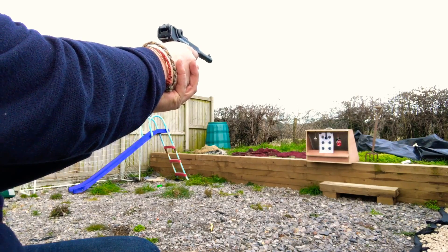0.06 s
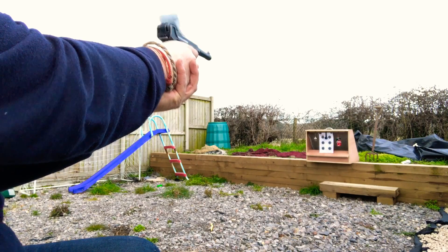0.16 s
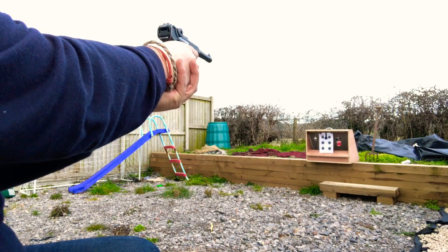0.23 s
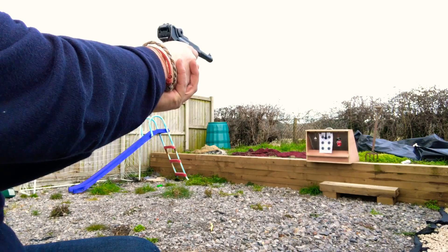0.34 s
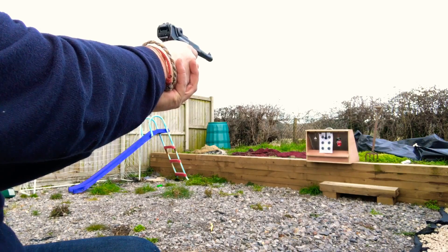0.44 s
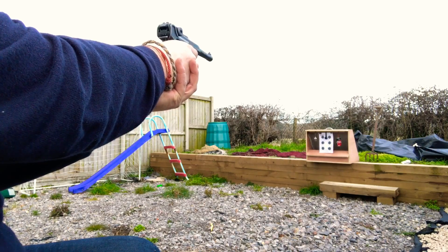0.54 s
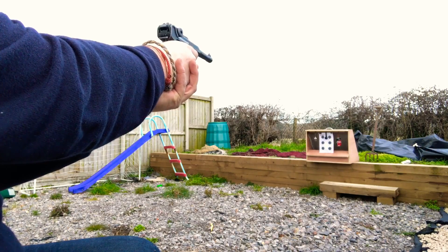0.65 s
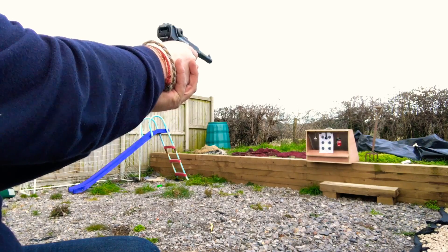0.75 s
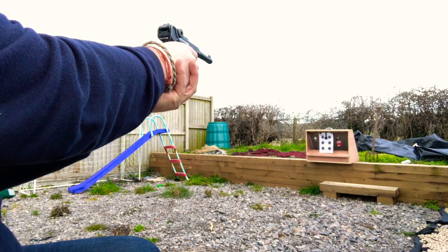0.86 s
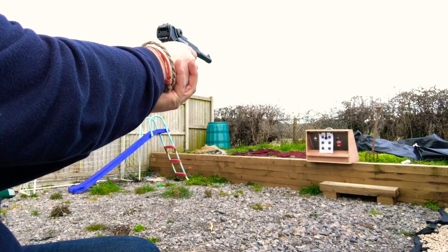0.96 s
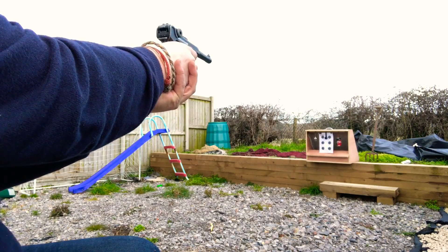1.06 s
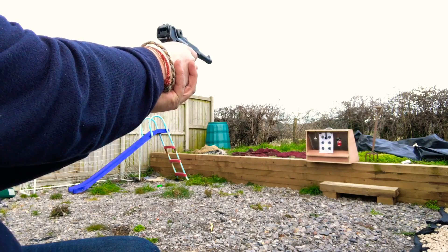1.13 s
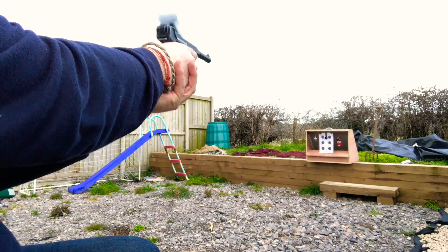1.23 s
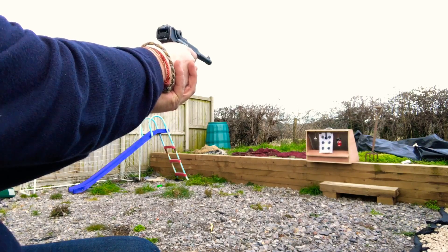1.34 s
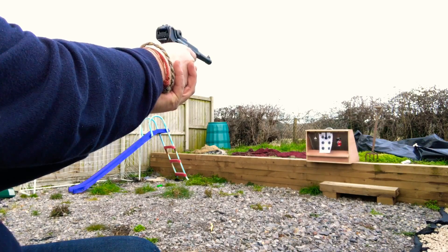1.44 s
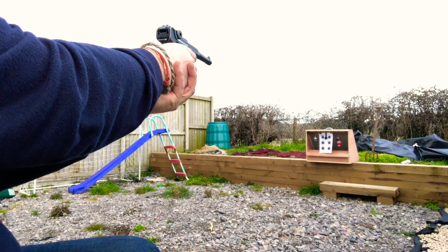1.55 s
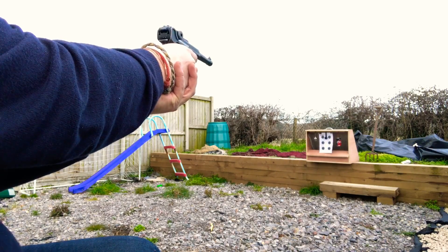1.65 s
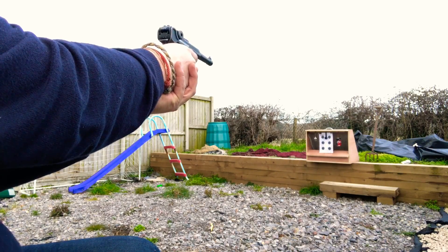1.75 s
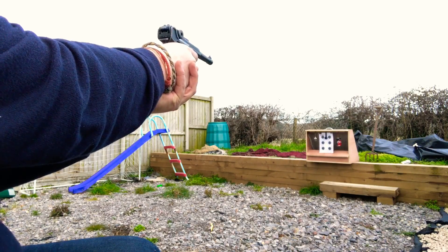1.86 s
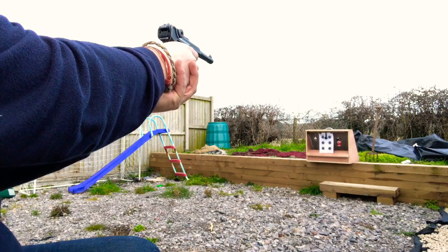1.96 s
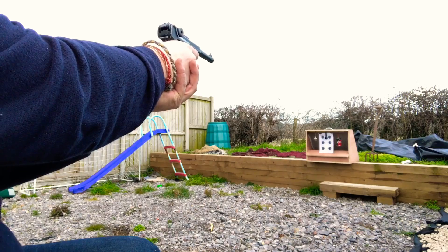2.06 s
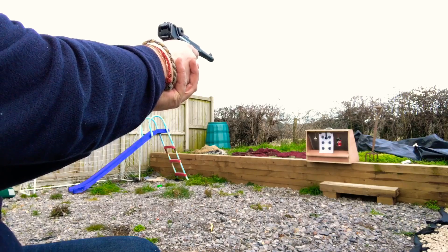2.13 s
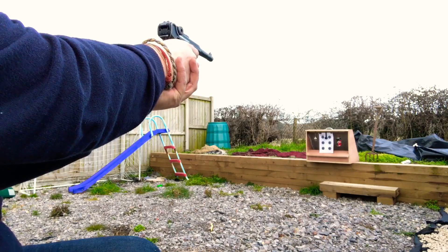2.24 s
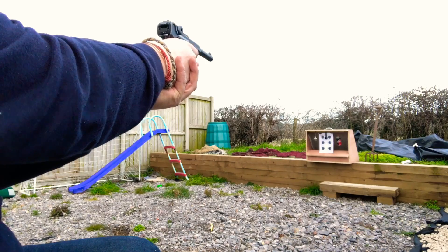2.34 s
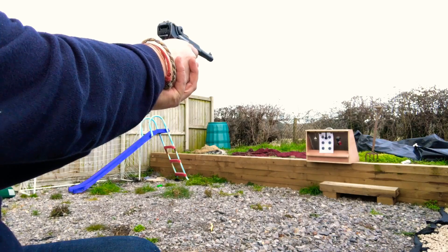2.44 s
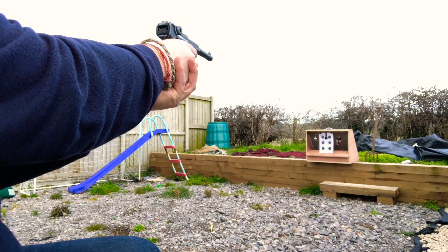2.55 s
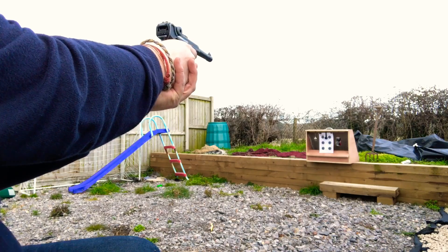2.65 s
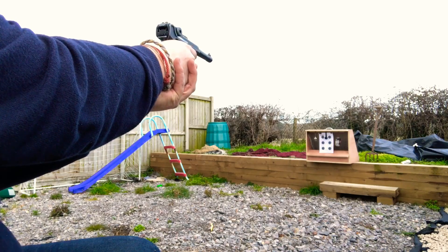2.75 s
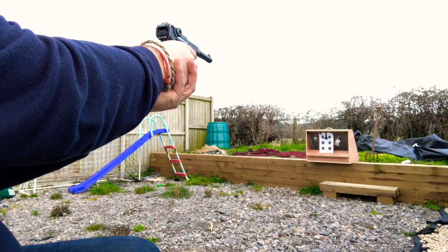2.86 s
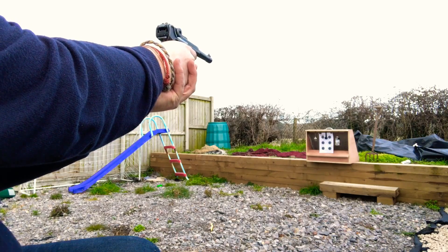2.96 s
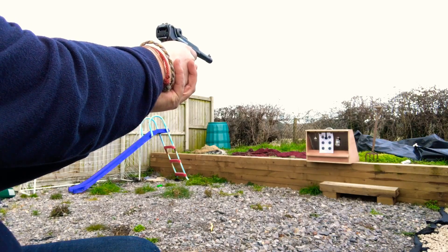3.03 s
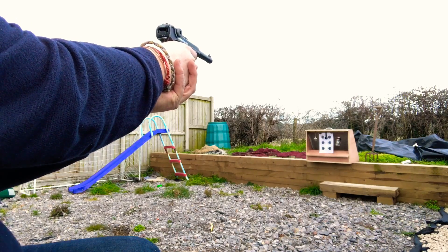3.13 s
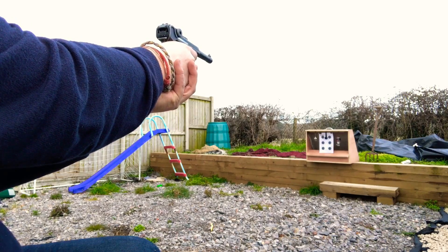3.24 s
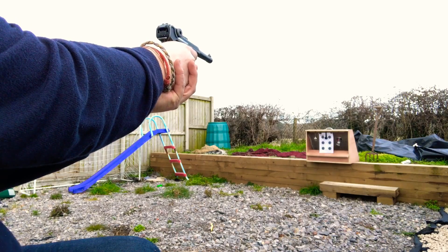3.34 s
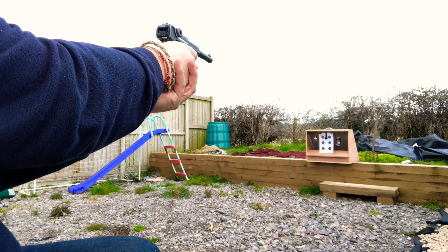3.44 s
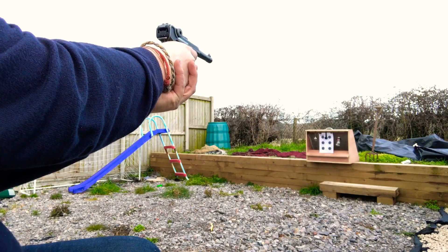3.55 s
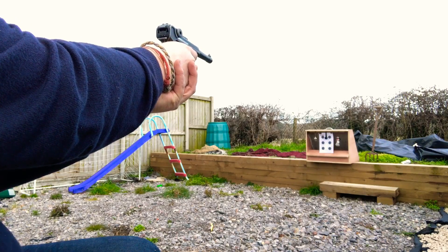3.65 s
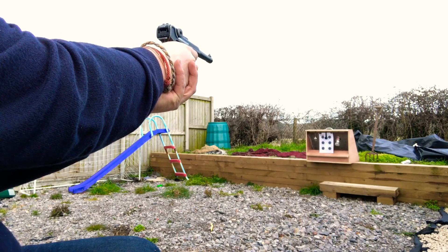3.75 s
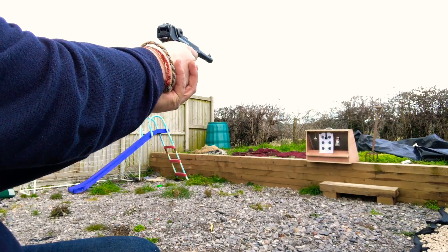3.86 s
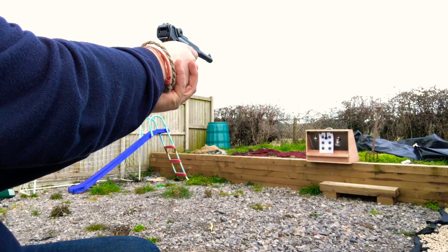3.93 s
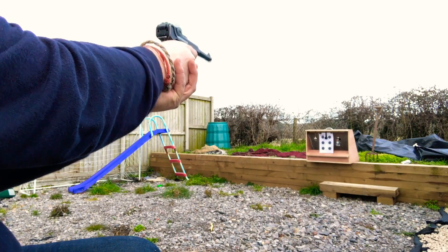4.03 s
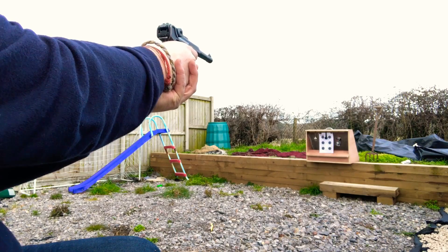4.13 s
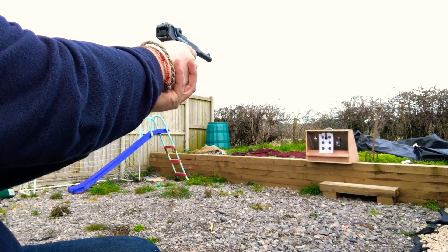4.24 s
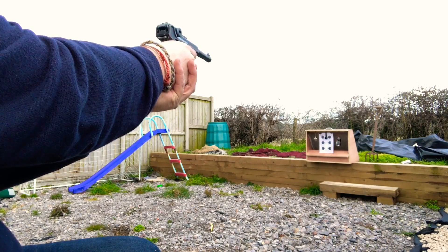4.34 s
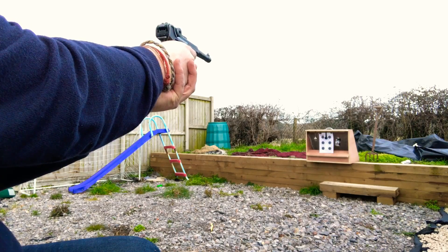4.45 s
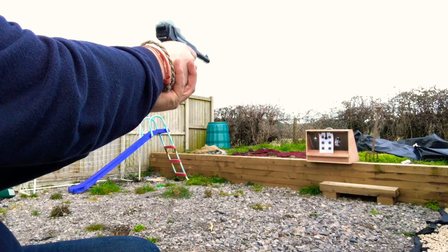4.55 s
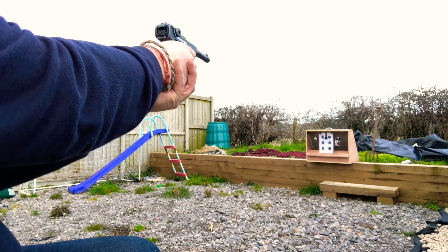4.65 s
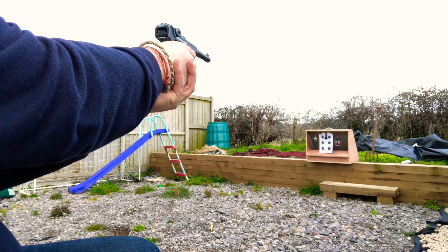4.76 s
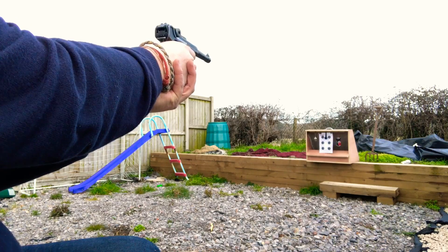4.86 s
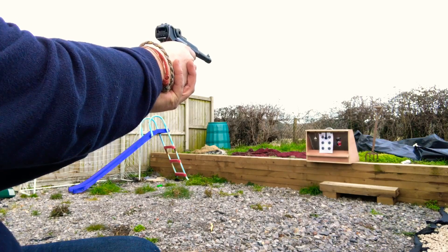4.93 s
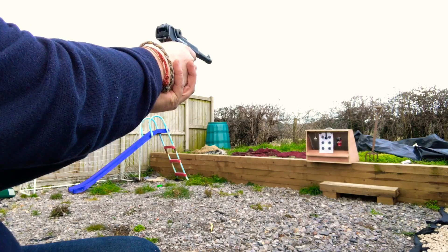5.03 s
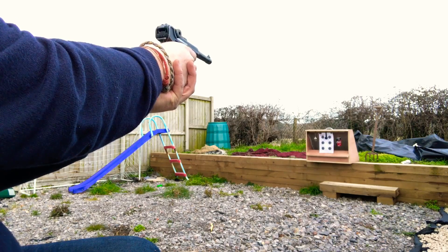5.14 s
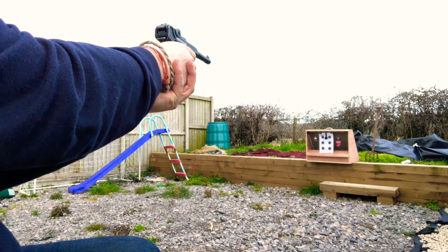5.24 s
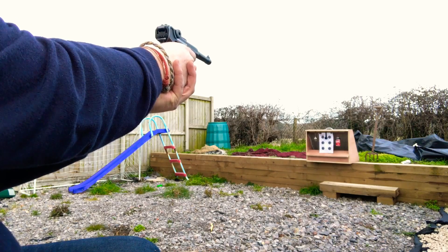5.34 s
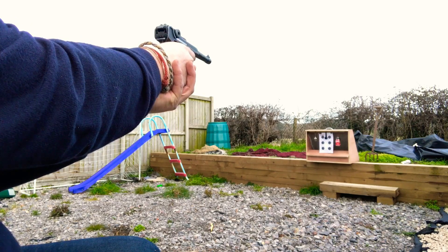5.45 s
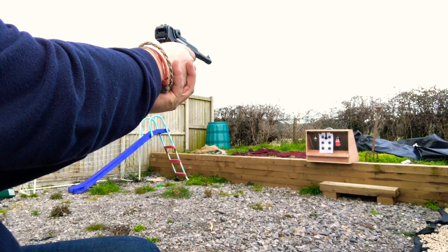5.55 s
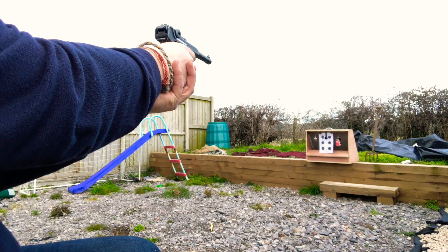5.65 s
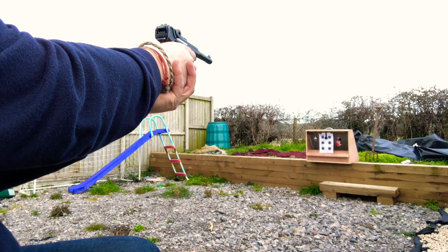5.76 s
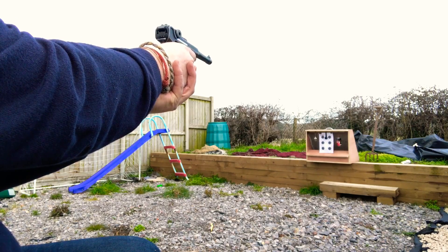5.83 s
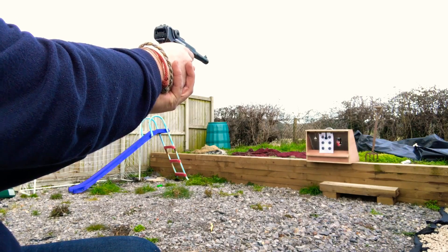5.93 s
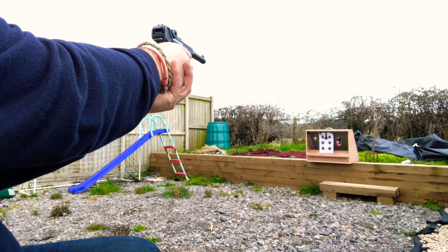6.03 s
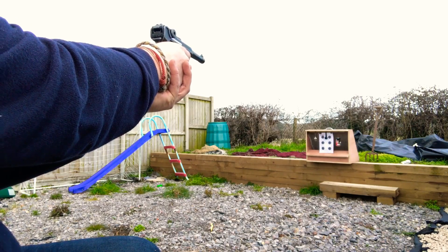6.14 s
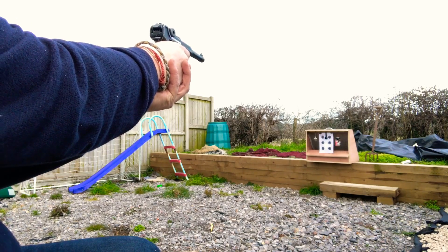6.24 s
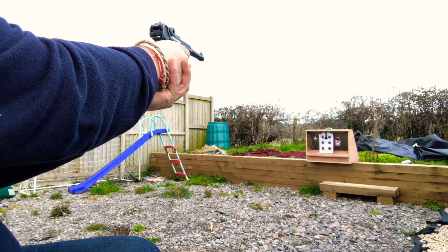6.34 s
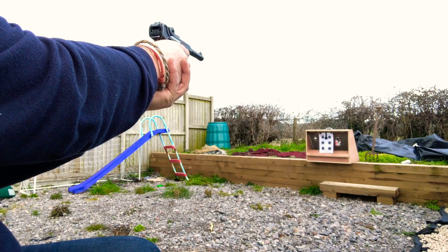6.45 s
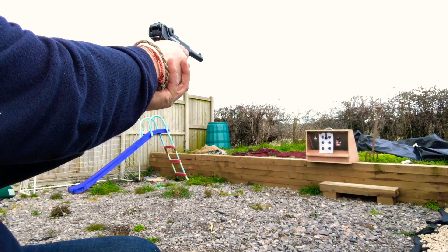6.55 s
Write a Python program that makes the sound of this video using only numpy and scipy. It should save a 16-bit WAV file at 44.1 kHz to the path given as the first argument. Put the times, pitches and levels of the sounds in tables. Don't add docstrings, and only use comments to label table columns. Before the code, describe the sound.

Seven snappy air pistol shots pop and clack close by outdoors, pellets rap a box, and one metal flap rattles to rest.

```python
import sys
import numpy as np
from scipy import signal
from scipy.fft import rfft, irfft
from scipy.io import wavfile
from scipy.ndimage import uniform_filter1d

SR = 44100
rng = np.random.default_rng(int(sys.argv[2]) if len(sys.argv) > 2 else 0)


def wrap_up_sound(samples):
    columns = np.atleast_2d(samples).T
    tamed = np.clip(columns, -1, 1)
    steps = np.round(tamed * 32767).astype(np.int16)
    wavfile.write(sys.argv[1], SR, steps)


def boost_factor(decibels):
    exponent = np.asarray(decibels, float) / 20
    return 10 ** exponent


N = 290619

# frequency in Hz, density in dB per Hz.
TOWN_SPECTRUM = [(15, -48.5), (25, -25.5), (40, -9.5), (65, -2.5), (220, -6), (445, -13.5), (902, -5.5),
                 (1430, -18), (1640, -24), (1950, -28.5), (2330, -33), (3150, -34), (4860, -35),
                 (14800, -47), (16500, -55)]
# start in seconds, length in seconds, first pitch in Hz, last pitch in Hz, level in dB.
BIRD_CALLS = [(0, 0.22, 3360, 3500, -80), (5.62, .24, 1960, 2090, -67.5), (5.82, .23, 2090, 2130, -76),
              (5.985, .1, 2950, 3050, -75), (6.06, .22, 3050, 3170, -70), (6.09, 0.19, 3330, 3370, -74),
              (6.14, 0.059, 3470, 3680, -72), (6.25, .05, 4300, 4200, -77), (6.335, .035, 6350, 6250, -76),
              (6.36, 0.13, 6100, 5450, -79), (6.335, 0.03, 4250, 4600, -76), (6.335, .03, 5200, 5500, -78),
              (6.395, 0.03, 4000, 3950, -73), (6.45, .03, 4200, 4150, -75), (6.5, .05, 4500, 4350, -79)]
# start in seconds, length in seconds, level in dB.
BIRD_NOTES = [(1.92, 0.063, -67), (2.12, .09, -65.5), (2.896, 0.11, -59), (3.303, 0.0682, -80),
              (3.65, 0.1547, -73), (3.82, 0.1173, -76), (4.448, 0.04195, -72.5)]
# time in seconds, level in dB.
SEAR = [(0.1853, -53.5), (0.191, -49.5), (0.1963, -43.5), (0.2031, -32), (0.751, -52), (0.759, -37),
        (1.256, -51), (1.265, -47.5), (1.2748, -57), (2.3133, -52.5), (2.3234, -42.5), (4.0322, -52),
        (4.038, -50.5), (4.0456, -43.5), (4.602, -43), (5.225, -50.5), (5.2327, -37)]
# time in seconds, level in dB.
HAMMER = [(0.2077, -8), (0.775, -4), (1.2768, -9), (2.3366, -9), (4.0558, -7.5), (4.622, -5.5),
          (5.2482, -6)]
VALVE = [(0.2132, -5), (0.7796, -6.5), (1.2825, -4.5), (2.3417, -4.5), (4.06, -9), (4.629, -7),
         (5.2538, -8)]
UNLOCK = [(0.2183, -13), (0.7885, -17.5), (1.2895, -15), (2.3506, -27), (4.0671, -14), (4.639, -15.5),
          (5.2566, -16)]
REAR_STOP = [(0.2266, -14), (0.7939, -18), (1.2995, -12.5), (2.3562, -14.5), (4.0703, -26), (4.6417, -23.5),
             (5.2689, -10.5)]
REBOUND = [(0.238, -22.5), (0.8033, -18.5), (1.311, -21.5), (2.3664, -17), (4.0792, -17.5), (4.652, -20.5),
           (5.2798, -19.5)]
SLAM = [(0.2753, -2), (0.8449, -4), (1.349, -5.5), (2.409, 3), (4.127, -4), (4.6951, -3), (5.3239, -1)]
# time in seconds, level in dB.
LOOSE = [(4.105, -16), (5.26, -17.5), (5.3, -20.5), (5.2645, -22.5), (5.299, -24.5), (.2495, -24),
         (4.6575, -17.5)]
# level in dB, one a shot.
FEED_DB = [-23.5, -24.5, -20.5, -25, -21, -23, -24]
VOICES = {"hammer": (-0.42, 0.44, 13), "valve": (-1, -0.78, 15), "unlock": (1.9, -0.55, 17),
          "rear": (-0.96, -2.5, 27), "rebound": (-1, -0.54, 45), "feed": (-7, -4.5, 22),
          "slam": (-2.5, 0.31, 5.5), "loose": (-3, -2.5, 6.5), "trigger": (-1.5, -1.5, 2.7)}
# frequency in Hz, level in dB, T60 in seconds.
GUN_MODES = [(1263, -6.5, 0.017), (3640, -14.5, .01), (4350, -11, .01), (5130, -2, 0.014),
             (6770, 0, 0.0079), (7651.5, -4.5, 0.02), (11570, -1, 0.014), (13510, -5, 0.024)]
# start in seconds, muzzle pop after it in ms, breech thump after it in ms, thump polarity.
SHOTS = [(.2085, 4.3, 15.1, -1), (.7747, 5, 18.5, 1), (1.2756, 7.7, 19.4, -1), (2.3377, 4, 18.2, 1),
         (4.0568, 3.9, 17.5, 1), (4.6235, 3.5, 18.7, 1), (5.2496, 3.4, 19.2, 1)]
# pop in dB, thump in dB, gas in dB, slide scrape in dB.
CHARGE = [(-16, -8, -19, -28), (-17, -7.5, -17.5, -24.5), (-16, -9.5, -20, -29), (-13.5, -7.5, -19, -28.5),
          (-19.5, -11, -19.5, -27), (-16.5, -6.5, -17, -28.5), (-20, -5, -24.5, -28.5)]
# frequency in Hz, density in dB per Hz.
GAS_SPECTRUM = [(88, -30), (150, -6.5), (371, -7), (720, -9), (1400, -6.5), (3040, -8), (5170, -5),
                (12000, -12.5), (16500, -21)]
# band centre in Hz, level in dB, T60 in seconds.
YARD_BANDS = [(118, -21, 0.27), (267, -29.5, .55), (469.7, -19.5, 0.38), (720, -23.5, 0.41),
              (1078, -10.5, 0.23), (1500, -23, .33), (1940, -20, 0.6), (4070, -21.5, 0.47),
              (8028, -17, 0.37), (13900, -15, 0.15)]
# delay in ms, level in dB.
ECHOES = [(12, -21.5), (25, -19), (49, -28), (88, -21.5)]
# time in s, level in dB, lows against mids in dB, highs against mids in dB, T60 in ms.
HITS = [(0.2923, -5.5, 7, -13.5, 5.1), (0.3049, -24.5, 0.5, -9, 59), (0.3344, -19, 1, -14.5, 7.3),
        (0.339, -28, 6.5, -14, 4.18), (0.8563, -12, -13, -14, 6.3), (0.859, -12.5, 3.5, -2, 5.366),
        (0.8715, -22.5, 6, -9.5, 45.8), (1.3655, -16, 4.5, -2.5, 7.2), (1.3673, -4, 0.5, -10.5, 3.5),
        (1.3764, -26, 9.5, 18, 39), (1.4034, -25.5, -10, -15, 15), (1.4079, -24, 10.5, -2, 13.3),
        (2.4212, -18.5, -4, -2.5, 120), (2.4257, -11, 3.5, -0.5, 22), (4.7109, -15, 4.5, -16.5, 37),
        (4.7256, -22.5, -5.5, -5, 22), (4.7516, -22, -12.5, -10.5, 13.3), (5.338, -18.5, 1.5, -2.5, 47)]
# frequency in Hz, level in dB, T60 in seconds.
BOX_MODES = [(342, -16, 0.15), (1140, -15, 0.062), (1617, -17, 0.014), (2450, -19, 0.018),
             (3040, -3, 0.014), (3460, -1.5, 0.014), (4430, -8.5, 0.028), (7360, -9, 0.017)]
# time in seconds, level in dB, centre in Hz, T60 in ms.
KNOCKS = [(.293, -28.5, 1719, 9.8), (0.305, -26, 1300, 24.19), (0.338, -21, 1150, 14),
          (0.5753, -42, 1500, 12), (0.6103, -44.5, 1850, 28.06), (0.86, -20, 1500, 15),
          (0.873, -28.5, 1200, 39.67), (1.369, -24, 1407, 12.52), (1.376, -31, 1200, 21.53),
          (1.406, -23, 1400, 22), (1.6531, -41.5, 1300, 16.2), (1.6955, -41, 1817, 12),
          (1.7618, -48.5, 1688, 13.07), (1.9017, -47, 1584, 16.6), (2.4253, -12.5, 1300, 34),
          (2.655, -36, 1786, 33), (2.868, -42, 1500, 34), (2.868, -43, 2500, 25), (4.711, -18, 1500, 23.87),
          (4.727, -20.5, 1700, 27), (4.755, -21, 1400, 17), (4.93, -49.5, 1500, 12), (5.338, -17, 1293, 34),
          (5.4636, -42, 1700, 15), (5.51, -44, 1798, 23)]
# time
# in seconds, level in dB, centre in Hz, T60 in ms.
CLACKS = [(.2935, -13, 3100, 32), (0.78, -18, 3400, 30), (1.3675, -15.5, 3000, 30), (2.4255, -17, 3450, 40),
          (2.4255, -18, 4050, 35), (4.7115, -14, 3400, 35), (.418, -38, 3100, 30), (.982, -39, 2950, 30),
          (4.837, -36.5, 2950, 30.7), (.3345, -20, 7500, 14)]
# time in seconds, frequency in Hz, level in dB, T60 in seconds, swell in seconds.
RINGS = [(.3, 200, -31, 0.43, .03), (.34, 129.5, -43, .4, 0.029), (0.881, 125, -38.5, 0.38, 0.031),
         (.9, 200.6, -40.5, .4, 0.027), (.32, 2450, -42, 0.33, .005), (1.313, 380, -26, 0.18, .003),
         (1.375, 330, -33, 0.21, 0.013), (1.41, 199, -37, 0.47, 0.02552), (1.652, 1140, -47, .15, 0.002756),
         (2.424, 1150, -21.5, 0.24, .004), (2.44, 124.4, -43.5, 0.41, 0.035),
         (2.44, 301.6, -36.5, 0.2116, .01), (4.16, 127, -44.5, 0.54, 0.047), (4.72, 283.5, -38, 0.35, .01),
         (4.761, 138.5, -42, 0.43, 0.032), (5.339, 1140, -37, .25, 0.003001),
         (5.342, 310, -35, 0.28, 0.0043), (5.342, 434, -34.5, 0.3, 0.003843)]
# time in seconds, frequency in Hz, level in dB.
PANEL = [(2.44, 705, -38.5), (2.45, 1380, -42), (2.45, 870, -42), (2.46, 2680, -46), (2.52, 1007, -41.5),
         (2.57, 2590, -48), (2.6, 703, -51), (2.61, 1380, -44), (2.612, 2590, -45), (2.665, 1007, -42.5),
         (2.655, 1810, -40), (2.665, 704, -41.5), (2.665, 3220, -38), (2.668, 4700, -40),
         (2.669, 2590, -44), (2.73, 3200, -39), (2.744, 5200, -42), (2.75, 2590, -47), (2.76, 710, -47),
         (2.75, 1014, -44), (2.751, 1380, -51), (2.849, 1200, -52), (2.55, 7700, -44), (2.665, 7660, -43),
         (2.75, 7700, -36), (2.61, 12800, -42), (2.75, 12800, -42.5), (2.88, 720, -52)]
# time in seconds, level in dB, steel hum in dB.
WALL = [(0.4172, -33, -47), (0.9812, -35, -52), (1.492, -39, -55), (4.836, -37, -52), (5.4636, -41, -64)]
# time in s, level in dB, lows against mids in dB, highs against mids in dB, T60 in ms.
BOUNCES = [(0.4217, -44, 18, -16.5, 27), (0.4367, -39, 10.5, -8.5, 10), (0.466, -47.5, 12.5, -14, 11),
           (0.573, -33, 12, -8, 5.2), (0.6085, -49, 11.5, -19.5, 32), (0.6842, -53.5, 13.5, -14, 12),
           (0.984, -45.5, -10, 6, 11), (0.9905, -37.5, -6.5, 4, 9.6), (1.6528, -37.5, -0.5, -14, 7.7),
           (1.6954, -52, 17, 6.5, 9.3), (1.707, -60.5, 19, -5.5, 10.7), (1.7618, -43, 4, -17, 16.5),
           (1.9013, -43, 1.5, -17, 17.7), (4.81, -45.5, -13, -12.5, 12), (4.9295, -41.5, -1, -15.5, 11.6),
           (5.0426, -49, 6, -10.5, 17), (5.089, -57.5, -14.5, -3, 7), (5.1057, -71, -16.5, -15, 8.8),
           (5.4564, -42, -3, 13, 7.7), (5.5102, -53.5, 24, -11.5, 17)]
# time in seconds, level in dB.
TRIGGER = [(1.2449, -59.5), (2.25, -48), (2.2546, -65.5), (3.125, -63), (3.264, -61), (3.4307, -60.5),
           (3.5246, -66.5), (4.5753, -58), (4.5838, -63)]
# frequency in Hz, level in dB, T60 in seconds.
PELLET_MODES = [(1840, -14, 0.018), (3160, -7.5, 0.011), (3472, -3.5, 0.049), (4200, -7, 0.0089),
                (6200, -8, 0.019), (7440, -8.5, 0.015)]
# time in s, level in dB, lows against mids in dB, highs against mids in dB, T60 in ms.
FLAP = [(2.5276, -42.5, -19, -8, 49.14), (2.5471, -43.5, -2, -19, 68), (2.5515, -28.5, 0, -17, 15),
        (2.6087, -31, -9.5, -5.5, 35.47), (2.617, -31.5, -1, -9, 16), (2.6651, -31.5, 0, -9, 65),
        (2.7291, -38.5, -3, -17, 42), (2.7464, -27.5, -3, -4, 14), (2.7534, -31.5, -22, -8, 22),
        (2.7905, -46, 13, -16.5, 40), (2.8165, -39.5, 6.5, -21, 12.9), (2.8492, -42.5, -1, -6.5, 29),
        (2.8735, -47, 5, -10.5, 15.6), (2.9028, -37, -4, -2.5, 19), (2.9157, -40.5, 1, -11, 15.2)]
# frequency in Hz, level in dB, T60 in seconds.
TIN_MODES = [(855, -17.5, 0.3), (1183, -5.5, 0.07226), (1504, -16, 0.23), (2404, -38, 0.16),
             (2998, -21, 0.091), (3360, -12.5, 0.1698), (3424, -17, 0.058), (3970, -14, 0.0889),
             (4760, -7, 0.13), (5315.5, -7.5, 0.1559), (7808, 2.5, 0.087), (9031.2, -12, 0.037),
             (10280, -12, 0.04), (12660, 3.5, 0.05824)]
# time in seconds, level in dB.
CHATTER = [(2.44, -48.5), (2.55, -54.5), (2.64, -48.5), (2.72, -54.5), (2.8, -57), (2.9, -64), (2.97, -60),
           (3.0, -83.5)]


def unit(x):
    return x / np.sqrt(np.mean(x ** 2))


def add(out, s, piece):
    k = int(s * SR)
    out[k:k + len(piece)] += piece[:N - k]


def band(x, lo_hz, hi_hz):
    return signal.sosfilt(signal.butter(2, [lo_hz, min(hi_hz, .45 * SR)], "bandpass", fs=SR, output="sos"), x)


def colour(spectrum, size):
    hz, db = np.transpose(spectrum)
    grid = np.maximum(np.arange(size // 2 + 1) * SR / size, 1)
    gain = boost_factor(np.interp(np.log(grid), np.log(hz), db))
    return unit(irfft(rfft(rng.standard_normal(size)) * gain, size))


def fade(t, t60, rise=0.00078):
    return (1 - np.exp(-t / rise)) * np.exp(-np.log(1000) * t / t60)


def walk(rate):
    k = int(SR / rate)
    held = np.repeat(rng.standard_normal(N // k + 1), k)
    return 0.57 * uniform_filter1d(uniform_filter1d(held, k), k)[:N]


def cluster(hz, t, spread):
    detune, phase = rng.standard_normal((2, 3, len(hz), 1))
    partials = np.sin(2 * np.pi * (hz * (1 + spread * detune) * t + phase))
    return np.sum(partials, axis=0) / np.sqrt(3)


def town():
    x = colour(TOWN_SPECTRUM, size=N + N % 2)[:N]
    rumble = band(x, 20, 400) * (boost_factor(1.2 * walk(6.6)) - 1)
    roar = band(x, 400, 1500) * (boost_factor(2.1 * walk(15.0)) - 1)
    return boost_factor(-58) * (x + rumble + roar)


def birds():
    out, waver = np.zeros(N), 1 + .035 * walk(400)
    note_hz = 2590
    for s, length, hz0, hz1, db in BIRD_CALLS + [(s, d, note_hz, note_hz, db) for s, d, db in BIRD_NOTES]:
        u = np.linspace(0, 1, int(length * SR))
        hz = (hz0 + (hz1 - hz0) * u) * waver[int(s * SR):][:len(u)]
        add(out, s, boost_factor(db) * np.sin(np.pi * u) ** 0.55 * np.sin(2 * np.pi * np.cumsum(hz) / SR))
    return out * boost_factor(5 * walk(40) + 5 * walk(200) - 4.5)


def voiced(table, part):
    return [(s, db, *VOICES[part]) for s, db in table]


def contacts(table, body, ring_db, snap_db, low_hz, rise, tail_db, tail_t60):
    (out, ringing), t = np.zeros((2, N)), np.arange(8192) / SR
    hz, mode_db, mode_t60 = np.transpose(body)[:, :, None]
    edges = [(low_hz, 4500), (4500, 8000), (8000, 19500), (300, 1500)]
    noise = np.array([unit(band(band(rng.standard_normal(SR), a, b), a, 1.1889 * b)) for a, b in edges])
    onset = 2 * (1 - np.exp(-t / rise))
    ring_t = t[:int(min(max(mode_t60.max(), .01), .18) * SR)]
    for s, db, lows_db, highs_db, ms in table:
        k = rng.integers(SR - 8192)
        lows, mids, highs, rattle = noise[:, k:k + 8192]
        burst = unit(boost_factor(lows_db) * lows + mids + boost_factor(highs_db) * highs)
        decay = onset * fade(t, max(ms, 4) / 1000, rise)
        buzz = boost_factor(tail_db) * fade(t, tail_t60, rise)
        add(out, s - rise, boost_factor(db) * burst * (decay + buzz) * boost_factor(3.41 * rattle))
        add(out, s, boost_factor(db + snap_db) * burst * fade(t, .001, rise=.00003))
        tilt_db = np.interp(hz, [2500, 6000, 11000], [lows_db, 0, highs_db]) - max(lows_db, 0, highs_db)
        struck_db = 4 * rng.standard_normal((len(hz), 1))
        modes = boost_factor(mode_db + tilt_db + struck_db) * cluster(hz, ring_t, spread=0.023)
        add(ringing, s, boost_factor(db + ring_db) * np.sum(modes * fade(ring_t, mode_t60, rise), axis=0))
    return np.array([out + ringing, out + boost_factor(-8) * ringing])


def action():
    sear = [(s, db, -6, 0, 7) for s, db in SEAR]
    fall = voiced(HAMMER, "hammer") + voiced(VALVE, "valve")
    feed = [(s - .0084, db) for (s, _), db in zip(SLAM, FEED_DB)]
    slide = voiced(UNLOCK, "unlock") + voiced(REAR_STOP, "rear") + voiced(REBOUND, "rebound")
    slide += voiced(feed, "feed") + voiced(SLAM, "slam") + voiced(LOOSE, "loose")
    struck = contacts(fall, GUN_MODES, ring_db=-6, snap_db=1.5, low_hz=870, rise=.0013,
                      tail_db=-24, tail_t60=0.065)
    return struck + contacts(slide + sear, GUN_MODES, ring_db=-6, snap_db=7.0, low_hz=870, rise=.0006,
                             tail_db=-24, tail_t60=0.081)


def hiss():
    out, t = np.zeros(N), np.arange(8192) / SR
    for (s, _, thump_ms, _), (_, thump_db, gas_db, scrape_db) in zip(SHOTS, CHARGE):
        jet = colour(GAS_SPECTRUM, size=8192)
        spring = cluster(np.array([[8200]]), t, spread=0.0044)[0]
        add(out, s - .017, boost_factor(-47.0) * spring * fade(t, 0.13, rise=0.016))
        add(out, s - .006, boost_factor(-32.5) * jet * fade(t, 0.028))
        add(out, s - .004, boost_factor(-29.5) * jet * np.exp(-np.abs(t - .004) / 0.0044))
        rush = colour(GAS_SPECTRUM, size=8192)
        add(out, s + 0.015, boost_factor(gas_db) * rush * fade(t, 0.12, rise=0.00061))
        stroke = np.exp(-.5 * ((t - .062) / np.where(t < .062, .011, .004)) ** 2)
        add(out, s, boost_factor(scrape_db) * jet * stroke)
        late = t - .05
        thud = np.cos(2 * np.pi * 75 * late) * np.exp(-.5 * (late / .011) ** 2)
        add(out, s + thump_ms / 1000 - .032, boost_factor(thump_db - 30) * thud)
    return out


def puff(hz, lift_hz, width_ms):
    t = np.arange(-.01, .02, 1 / SR)
    cycles = hz * t - lift_hz * .0015 * np.expm1(-np.maximum(t, -.004) / .0015)
    spread = np.where(t < 0, .75, 1.2) * width_ms / 1000
    return np.cos(2 * np.pi * cycles) * np.exp(-.5 * (t / spread) ** 2)


def gas_thumps():
    out = np.zeros(N)
    for (s, pop_ms, thump_ms, sign), (pop_db, thump_db, _, _) in zip(SHOTS, CHARGE):
        add(out, s + pop_ms / 1000 - .01, boost_factor(pop_db) * puff(hz=230, lift_hz=30, width_ms=1.6))
        add(out, s + thump_ms / 1000 - .01, sign * boost_factor(thump_db) * puff(hz=220, lift_hz=90, width_ms=2.3))
    return signal.sosfiltfilt(signal.butter(1, 60, "highpass", fs=SR, output="sos"), out)


def yard(dry, thumps):
    t = np.arange(SR) / SR
    tail = 0
    for hz, db, t60 in YARD_BANDS:
        patches = boost_factor(8 * walk(170)[:SR] + 4 * walk(45)[:SR] - 3)
        scatter = unit(band(rng.standard_normal(SR), hz / 1.375, hz * 1.39))
        tail = tail + boost_factor(db) * patches * scatter * fade(t, t60, rise=0.0033)
    wet = signal.fftconvolve(dry + thumps, boost_factor(-36.5) * tail)[:N]
    return wet + sum(boost_factor(db) * np.roll(thumps, int(ms * SR / 1000)) for ms, db in ECHOES)


def box_hits():
    return contacts(HITS, BOX_MODES, ring_db=-2, snap_db=13, low_hz=2700, rise=0.00044,
                    tail_db=-17.5, tail_t60=0.062)


def knocks():
    out, t = np.zeros(N), np.arange(4096) / SR
    for s, db, hz, ms, w in [(*k, 1.45) for k in KNOCKS] + [(*k, 1.12) for k in CLACKS]:
        thud = band(band(rng.standard_normal(8192), hz / w, hz * w), hz / w, hz * w)[4096:]
        add(out, s, boost_factor(db) * unit(thud) * fade(t, ms / 1000, rise=.0008))
    return out


def rings():
    out, t = np.zeros(N), np.arange(SR // 2) / SR
    panel = [(s, hz, db, .3 * (1000 / hz) ** .35, .004) for s, hz, db in PANEL]
    for s, hz, db, t60, swell in RINGS + panel:
        spread = .006 + (hz < 500) * 9 / hz
        add(out, s, boost_factor(db) * cluster(np.array([[hz]]), t, spread)[0] * fade(t, t60, swell))
    return out * boost_factor(6 * walk(70))


def wall_smear():
    out, t = np.zeros(N), np.arange(SR // 2) / SR
    hum_hz, width_hz = 5630, 300
    for s, _, db in WALL:
        smear = unit(band(rng.standard_normal(len(t)), hum_hz - width_hz / 2, hum_hz + width_hz / 2))
        add(out, s - .01, boost_factor(db + 1.5) * smear * fade(t, .3, rise=.015))
    return out * boost_factor(9 * walk(70))


def wall_cracks():
    return contacts([(s, db, 3, -30, 22) for s, db, _ in WALL], PELLET_MODES, ring_db=-8, snap_db=-20,
                    low_hz=2400, rise=0.0012, tail_db=-25, tail_t60=0.1)


def bounces():
    return contacts(BOUNCES + voiced(TRIGGER, "trigger"), PELLET_MODES, ring_db=-10, snap_db=2.5,
                    low_hz=2500, rise=0.00019, tail_db=-11.5, tail_t60=0.017)


def flap_clatter():
    return contacts(FLAP, TIN_MODES, ring_db=-6, snap_db=0, low_hz=2335, rise=0.0019,
                    tail_db=-17, tail_t60=0.32)


def hinge_buzz():
    level_db = np.interp(np.arange(N) / SR, *np.transpose(CHATTER), left=-150, right=-150)
    buzz = band(band(rng.standard_normal(N), 2500, 16000), 2400, 16000)
    return boost_factor(level_db + 9 * walk(300) + 8 * walk(60)) * unit(buzz)


def scene():
    thumps = gas_thumps()
    near = hiss() + action()
    far = box_hits() + knocks() + wall_cracks() + bounces() + flap_clatter() + hinge_buzz()
    wet = yard(near[1] + boost_factor(3.0) * far[1], thumps)
    direct = near[0] + far[0] + thumps + rings() + wall_smear()
    return (direct + wet + birds() + town())[None]


def duck(x):
    attack_s, release_s, threshold_db = 0.0026, .012, -13.5
    power = x ** 2
    for s in attack_s, release_s:
        keep = np.exp(-1 / (s * SR))
        power = signal.lfilter([1 - keep], [1, -keep], power)
    return x / np.sqrt(1 + power / boost_factor(threshold_db) ** 2)


def roll_off(x):
    return signal.sosfilt(signal.butter(12, 17150, fs=SR, output="sos"), x)


def record(dry):
    mix = .75 * np.tanh(boost_factor(2) * duck(dry) / .75)
    mix = signal.sosfilt(signal.ellip(8, .2, 60, 17100, fs=SR, output="sos"), mix)
    mix = signal.sosfilt(signal.ellip(6, .2, 20, 15900, fs=SR, output="sos"), mix)
    return roll_off(mix)


dry = scene()
out = record(dry)
wrap_up_sound(out)
```